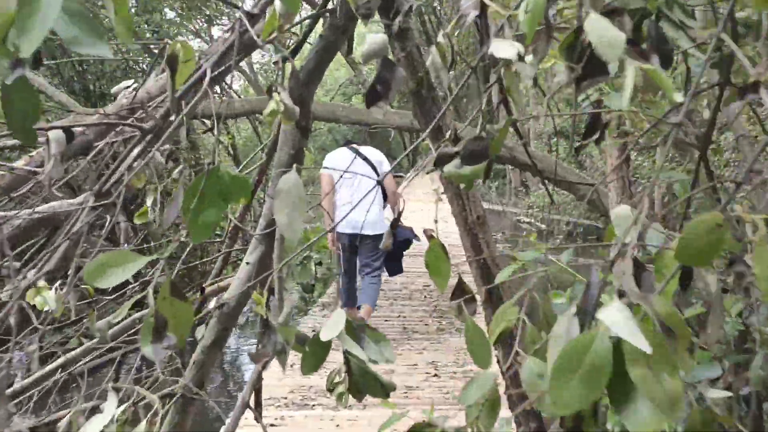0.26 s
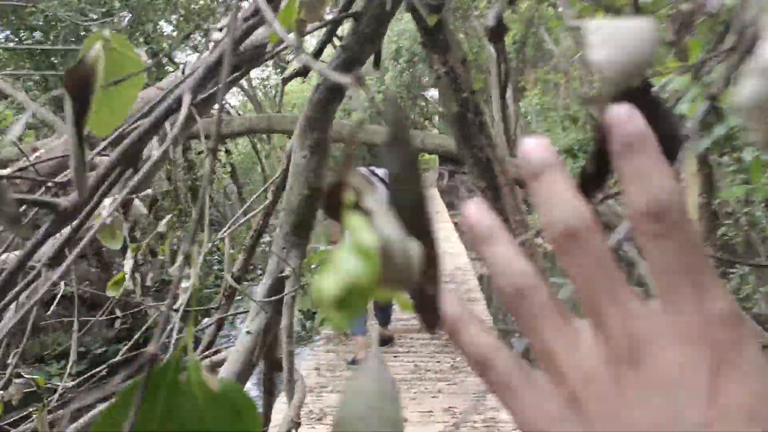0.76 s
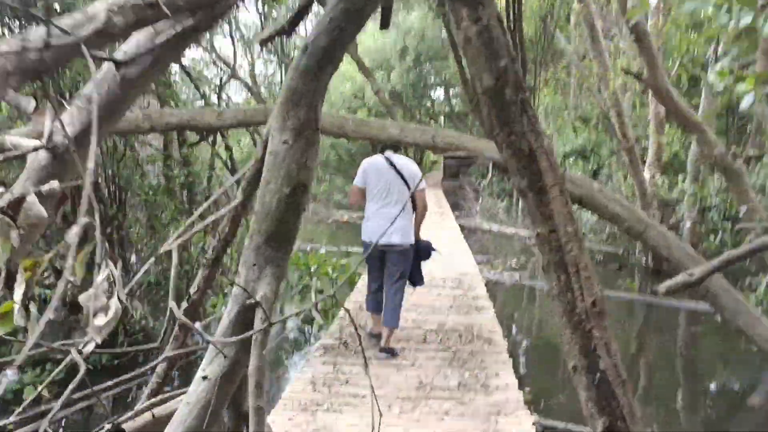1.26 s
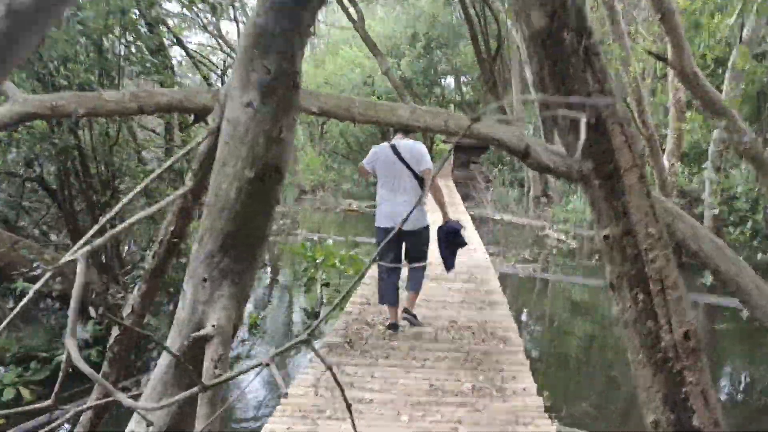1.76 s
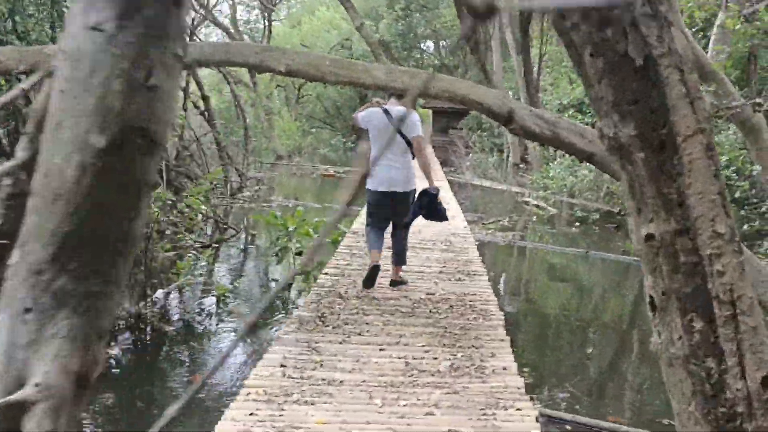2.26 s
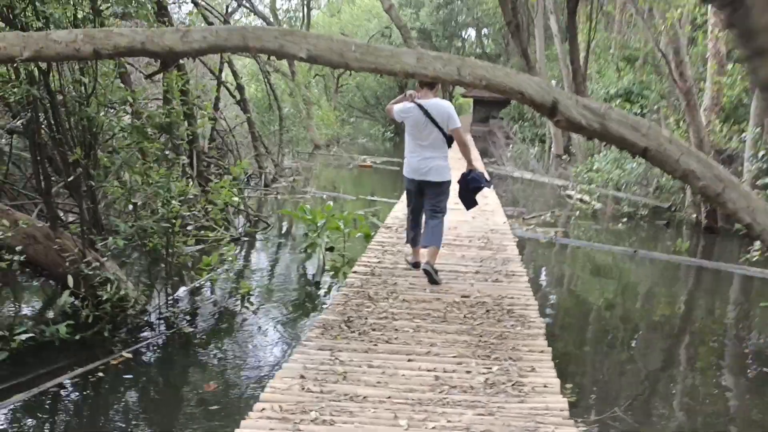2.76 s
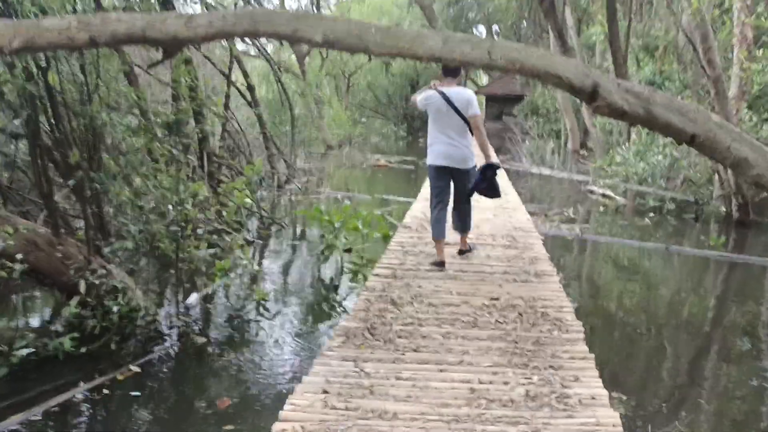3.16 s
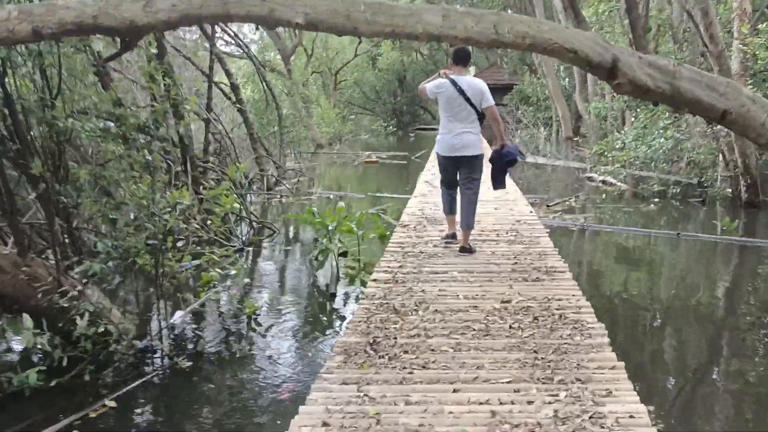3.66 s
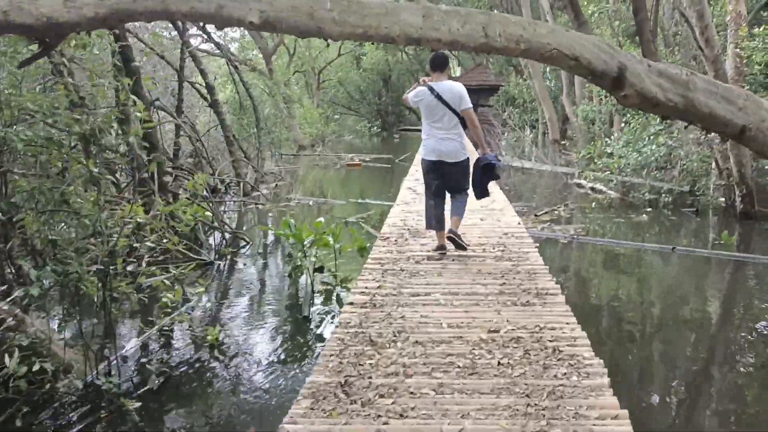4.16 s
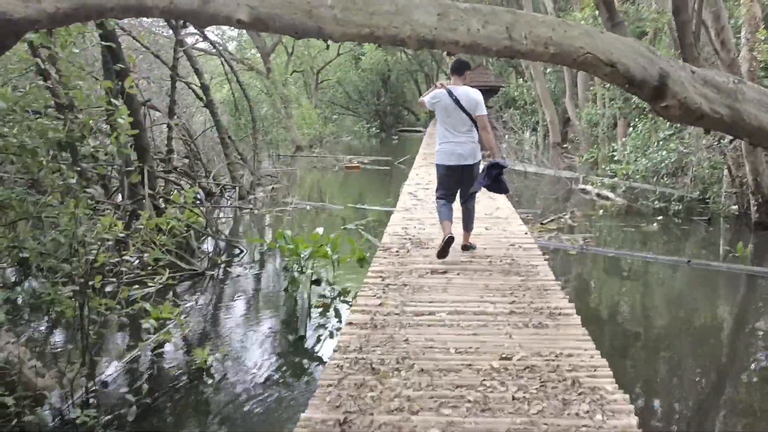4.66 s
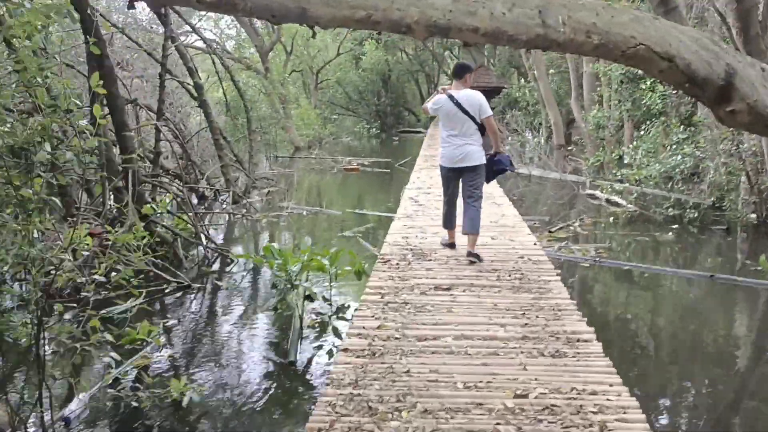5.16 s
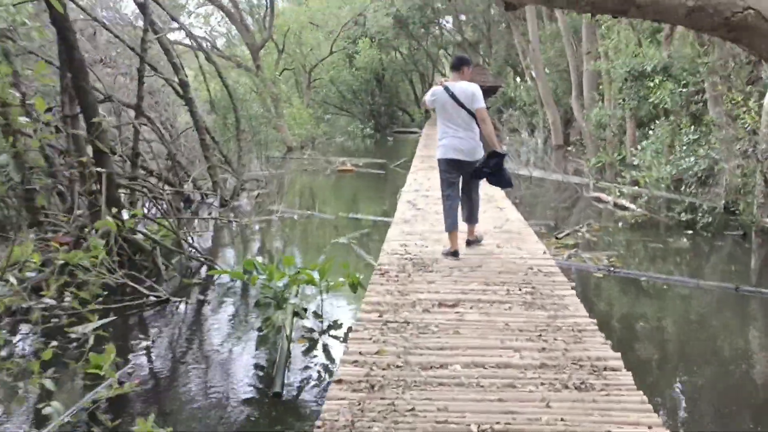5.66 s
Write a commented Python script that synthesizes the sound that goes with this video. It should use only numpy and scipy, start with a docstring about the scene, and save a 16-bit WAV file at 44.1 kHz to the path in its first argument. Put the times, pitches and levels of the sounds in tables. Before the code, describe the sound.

A walker carries two microphones along a bamboo boardwalk through a mangrove forest. From the start to about 2.6 s, branches drag past very close: coarse rubbing, crisp leaf crinkle and short stem scrapes come in overlapping strokes. A stem cracks sharply near 0.8 s; twigs flick and knock, densest from 1.8 to 2.6 s, with the hardest snap just before 2.0 s, leaning left. A lower rasp drags underneath from 1.6 to 2.4 s. Then it quiets abruptly. Soft leaf swells brush the left between 2.9 and 3.8 s, and a few return after 5.3 s. Light steps clack at about 2.2, 3.1, 3.7, 4.5 and 5.6 s, some faintly hollow. Low puffs of air bump the microphones between 2.7 and 4.3 s. Faint high bird whistles run throughout, with falling phrases at 3.3 and 4.8 s, lingering in the trees over low forest noise and a barely audible shimmer.

```python
"""A bamboo boardwalk through a mangrove forest, heard by a walker carrying two microphones.
In the first seconds low branches drag past close by: random slips are coloured as rub, crinkle and rasp, and
twigs, snaps and cracks are struck resonances and pulses. Slats clack underfoot over a hollow pole, soft swells
of rub and crinkle come and go, and puffs of air are low noise. Small birds whistle arched and falling gliding
tones that linger in a diffuse tail among the trees, over a low forest noise and a faint high shimmer."""
import sys
import numpy as np
from scipy import signal
from scipy.fft import rfft, irfft, next_fast_len
from scipy.io import wavfile

SR = 44100
rng = np.random.default_rng(int(sys.argv[2]) if len(sys.argv) > 2 else 0)


def unload_wav(signal):
    """Save mono or channel-first audio to the path in sys.argv[1] as 16-bit WAV at rate SR, clipped to [-1, 1]."""
    wavfile.write(
        sys.argv[1],
        SR,
        np.round(np.clip(np.atleast_2d(signal).T, -1, 1) * 32767).astype(np.int16),
    )


N = 260101
TIME = np.arange(N) / SR


def from_db(db):
    """Decibels to gain."""
    return 10 ** (np.asarray(db) / 20)


def rms_one(x):
    """Scale to rms 1."""
    return x / np.sqrt(np.mean(x ** 2) + 1e-20)


def peak_one(x):
    """Scale to peak 1."""
    return x / (np.abs(x).max() + 1e-20)


def butter(order, hz, kind="low"):
    """Sections of a smooth filter that passes the low, high or band range."""
    return signal.butter(order, hz, kind, fs=SR, output="sos")


def panned(x, pan_db):
    """Share a level difference, left minus right, between the two sides."""
    return x * from_db(np.array([[.5], [-.5]]) * pan_db)


def add(out, s, sound):
    """Mix a short stereo sound in at time s."""
    at = int(round(s * SR))
    first, last = max(at, 0), min(at + sound.shape[-1], N)
    out[:, first:last] += sound[:, first - at:last - at]


def drift(rate, size=N):
    """Smooth random wander of spread 1, with rate turning points per second at most."""
    knots = rng.standard_normal(size // 8 + 4)
    wander = np.interp(np.arange(size) * rate / SR, np.arange(len(knots)), knots)
    return wander * np.sqrt(3 / 2)   # interpolation had narrowed the spread


def coloured(x, spectrum):
    """Filter a signal by a curve of gain over frequency, steep beyond its ends; rms 1."""
    hz, db = np.transpose(spectrum)
    size = next_fast_len(N)
    log_hz = np.log(np.maximum(np.fft.rfftfreq(size, 1 / SR), 1))
    outside = np.maximum(np.log(hz[0]) - log_hz, 0) + np.maximum(log_hz - np.log(hz[-1]), 0)
    gain = from_db(np.interp(log_hz, np.log(hz), db) - 30 * outside)
    return rms_one(irfft(rfft(x, size) * gain, size)[..., :N])


def resonance(x, hz, t60):
    """A damped mode with gain 1 at its top, falling 60 dB in t60 seconds."""
    r = from_db(-60 / (max(t60, .001) * SR))
    top = np.array([1, 0, -1]) * (1 - r * r) / 2
    return signal.lfilter(top, [1, -2 * r * np.cos(2 * np.pi * hz / SR), r * r], x)


def pair(three, alike):
    """One shared and two separate signals make a stereo pair."""
    alike = np.clip(alike, 0, 1)
    return np.sqrt(alike) * three[0] + np.sqrt(1 - alike) * three[1:]


def slips(per_s, spread_db, smooth):
    """Friction: tiny slips of uneven size on a bed of smooth hiss, three unrelated rows."""
    sizes = from_db(spread_db * np.minimum(rng.exponential(1, (3, N)), 4))
    clicks = sizes * rng.choice([-1, 1], (3, N)) * (rng.random((3, N)) < per_s / SR)
    return rms_one(clicks) + smooth * rng.standard_normal((3, N))


def contact(rattle, rattle_s, size=8192):
    """A stereo click followed by a dying rattle."""
    force = rattle * rng.standard_normal((3, size)) * np.exp(-np.arange(size) / SR / rattle_s)
    force = pair(force, alike=0.15)
    force[:, 0] += 1
    return force


def stroke(s, hold_s, rise_s, fall_s):
    """Gain of a contact: rise, hold, fall; rise and fall times span 20 dB."""
    before_s, after_s = np.maximum(s - TIME, 0), np.maximum(TIME - s - hold_s, 0)
    return from_db(-20 * (before_s / rise_s + after_s / fall_s))


def bump(s, length):
    """A smooth swell of height 1 at time s, some 17 dB down one length to either side."""
    return np.exp(-2 * np.minimum(((TIME - s) / length) ** 2, 20))


# Side on which the branches pass, first right, then left.
# Each row: time in seconds, delay at the right microphone in seconds.
PASSING_SIDE = [(1.2, -.00014), (1.55, .0002)]


def far_side(x):
    """The microphone facing away from a near sound hears it a little later."""
    lag_s = np.interp(TIME, *np.transpose(PASSING_SIDE))
    return np.array([x[0], np.interp(TIME - lag_s, TIME, x[1])])


def thin_hiss(hz):
    """A narrow band of stereo hiss around one pitch; rms 1."""
    band = butter(2, [hz / 1.07, hz * 1.07], "band")
    return rms_one(signal.sosfilt(band, rng.standard_normal((2, N))))


# A faint shimmer high over the forest, as of far insects.
# Each row: frequency in Hz, level in dB.
SHIMMER = [(8050, -79), (10300, -84)]
SHIMMER_FLICKER_DB, SHIMMER_FLICKERS_PER_S = 1, 9.8


def shimmer():
    """Each high band of hiss flickers on its own."""
    out = np.zeros((2, N))
    for hz, db in SHIMMER:
        out += thin_hiss(hz) * from_db(db + SHIMMER_FLICKER_DB * drift(SHIMMER_FLICKERS_PER_S))
    return out


# Colour of the forest all around. Each row: frequency in Hz, relative level in dB per Hz.
FOREST_COLOUR = [(25, -5.5), (40, -10.5), (60, 6.5), (110, 7), (170, 1), (260, -2.5), (400, -12),
                 (750, -14.5), (1100, -17.5), (1600, -23), (2300, -30), (3200, -38.5)]
FOREST_DB = -62


def forest():
    """Low noise, mostly alike at both microphones, wavers slightly together with the shimmer."""
    noise = coloured(pair(rng.standard_normal((3, N)), alike=0.77), FOREST_COLOUR)
    return (from_db(FOREST_DB) * noise + shimmer()) * from_db(0.67 * drift(20))


# One falling phrase, sung twice. Each row: start in seconds, level in dB before the mix.
SONGS = [(3.312, -51), (4.835, -52.5)]
# Its syllables. Each row: start within the phrase in seconds, length in seconds, start pitch in Hz,
# end pitch in Hz, arch in Hz, level in dB against the song, rasp from 0 to 1, left minus right in dB,
# undertone in dB against the whistle.
PHRASE = [(0, .125, 3820, 3900, 300, -2.5, .1, 9, 0), (.04, .14, 4065, 3900, 40, 3.5, .65, 2.5, -22),
          (.39, .13, 3860, 3700, 0, -1, .06, 12, -9), (.49, .1, 3620, 3570, 0, -.5, .4, -6, -28),
          (.77, .165, 3660, 3540, 0, -1.5, .1, -2, -18.5)]
# Single whistles among the trees. Each row: start in seconds, length in seconds, start pitch in Hz,
# level in dB before the mix, left minus right in dB.
WHISTLES = [(-.08, 0.25, 3893, -50.5, 4.5), (0.28, 0.27, 3948, -52, 0.5), (0.859, 0.066, 3810, -55, 4),
            (1.029, 0.14, 3823, -49.5, 7), (1.219, 0.11, 3780, -59, 0), (1.456, 0.079, 3797, -47.5, 4.5),
            (2.194, 0.13, 3767, -52.5, 5), (2.556, 0.22, 3710, -55, 6.5), (2.867, 0.38, 5024, -65.5, 13.5),
            (3.459, 0.39, 4990, -70.5, 6.5), (4.015, 0.22, 4305, -69, 5), (4.424, 0.18, 4570, -70.5, 7.5),
            (5.283, 0.12, 3798, -49, 2.5), (5.32, 0.59, 4684, -66.5, 5.5),
            (5.429, 0.038, 2393, -63.5, 19.5)]
SAG_HZ_PER_S, WHISTLE_RASP = 280, 0.086   # every single whistle sinks at the same rate
WHISTLE_UNDERTONE_DB = -3.5


def notes():
    """Lay out every note of both songs and the single whistles, in the order that birds() unpacks."""
    out = []
    for song_s, song_db in SONGS:
        for s, length, start_hz, end_hz, arch_hz, db, *rest in PHRASE:
            out.append((song_s + s, length, start_hz, end_hz, arch_hz, song_db + db, *rest))
    for s, length, hz, db, pan_db in WHISTLES:
        end_hz = hz - SAG_HZ_PER_S * length
        out.append((s, length, hz, end_hz, 0, db, WHISTLE_RASP, pan_db, WHISTLE_UNDERTONE_DB))
    return out


# Weaker partials of the lower voices, whose whistle is the second partial.
# Each row: multiple of the fundamental, level in dB against the note's undertone setting.
VOICE = [(1, -4), (3, -26.5)]
OCTAVE_DB, PARTIAL_PAN_DB = -24.5, 3   # octave over the whistle; all added partials lie further left
PARTIAL_BREAK_DB = 3.5   # the weaker partials come and go within a note


def birds():
    """Thin whistles that arch or fall; a fast flutter of pitch makes some notes rasp."""
    out = np.zeros((2, N))
    for s, length, start_hz, end_hz, arch_hz, db, rasp, pan_db, undertone_db in notes():
        size = int(length * SR)
        along = np.clip(np.arange(size) / SR / length, 0, 1)
        hz = start_hz + (end_hz - start_hz) * along + arch_hz * np.sin(np.pi * along)
        hz = hz + 26 * drift(70, size) + 260 * rasp * drift(700, size)
        phase = 2 * np.pi * np.cumsum(hz) / SR
        swell = np.sqrt(2 * np.abs(np.sin(np.pi * along))) * from_db(db + 3.03 * drift(48, size))
        note = panned(np.sin(phase), pan_db)
        if 3000 < start_hz < 4200:   # the lower voices
            partials = from_db(OCTAVE_DB) * np.sin(2 * phase)
            for multiple, partial_db in VOICE:
                level_db = undertone_db + partial_db + PARTIAL_BREAK_DB * drift(72.8, size)
                partials = partials + from_db(level_db) * np.sin(phase * multiple / 2)
            note = note + panned(partials, pan_db + PARTIAL_PAN_DB)
        add(out, s, swell * note)
    return out


FOREST_T60_S = 0.6


def among_trees(x):
    """Trunks scatter a sound into a diffuse tail, different on each side."""
    age = np.arange(SR) / SR
    fade = from_db(-60 * age / FOREST_T60_S) * (1 - np.exp(-age / 0.017))
    tail = rng.standard_normal((2, SR)) * fade
    tail /= np.sqrt(np.sum(tail ** 2, axis=1, keepdims=True))
    return signal.fftconvolve(x, tail, axes=1)[:, :N]


# Branches sliding past close by. Each row: time of full contact in seconds, hold in seconds, rise in seconds,
# trail in seconds, rub at the left in dB, edge against the rub in dB, crinkle in dB,
# low rasp in dB before a 2 dB lift, left minus right in dB.
BRANCHES = [(0.33, 0.2, 0.21, 0.3, -41, -1, -55, -73.5, 6),
            (0.622, 0.18, 0.15, 0.53, -42.5, 1.5, -53, -71, 3),
            (1.074, 0.12, 0.052, 0.34, -49, 2, -63.5, -74.5, 3.5),
            (1.195, 0.33, .1, 0.16, -52.5, 1, -63.5, -87.5, 21),
            (1.576, 0.43, 0.03, 1, -44.5, 0.5, -60, -60, 9.5),
            (1.869, 0.085, 0.059, 1, -44, 4.5, -59.5, -56.5, 4.5),
            (2.081, 0.0054, 0.029, 0.054, -40, -5, -54.5, -74, 3),
            (2.193, 0.07, 0.034, 0.65, -45, 4.5, -56.5, -52.5, 3.5),
            (2.348, 0.22, 0.26, 0.35, -41.5, 2.5, -57.5, -65.5, 4.5)]
# Soft broadband swells of rub and crinkle, some coinciding with the bird calls.
# Each row: time of peak in seconds, half-width in seconds, rub at the left in dB, crinkle in dB,
# left minus right in dB.
SOFT_SWELLS = [(2.888, 0.078, -49.5, -66.5, 19), (3.019, 0.066, -50, -63.5, 22),
               (3.114, 0.05, -49, -58.5, 19), (3.214, 0.069, -70, -63.5, 28),
               (3.432, 0.12, -54.5, -62.5, 23), (3.565, 0.028, -50.5, -61.5, 17),
               (3.735, 0.05, -52, -56.5, 21), (5.321, 0.064, -60, -62, 5.5), (5.812, 0.054, -66, -59.5, 5),
               (5.888, 0.067, -50.5, -61, 2.5)]
IDLE_RUB_DB, IDLE_CRINKLE_DB, IDLE_PAN_DB = -73, -82, 19   # a faint steady rub and crinkle underneath
SLIP_OFF_S = 0.064   # time to fall 20 dB when a branch lets go
TRAIL_DB, TRAIL_PAN_DB = -2.5, 13   # its last leaves trail on lightly, further left
FLUTTER_DB, FLUTTERS_PER_S = 1.4, 70
CRINKLE_PAN_SHARE = 0.22   # of a contact's level difference between the sides


def friction_levels():
    """Powers of all layers add up to stereo dB levels of rub body, rub edge, crinkle and low rasp."""
    # the soft swells and the trailing leaves flutter in level
    flutter = from_db(FLUTTER_DB * drift(FLUTTERS_PER_S))
    touches = [(np.ones(N), IDLE_RUB_DB, 0, IDLE_CRINKLE_DB, IDLE_PAN_DB)]
    for s, length, rub_db, crinkle_db, pan_db in SOFT_SWELLS:
        touches.append((bump(s, length) * flutter, rub_db, 0, crinkle_db, pan_db))
    body, edge, crinkle, rasp = np.full((4, 2, N), 1e-18)
    for s, hold_s, rise_s, trail_s, rub_db, edge_db, crinkle_db, rasp_db, pan_db in BRANCHES:
        grip = stroke(s, hold_s, rise_s, SLIP_OFF_S)
        trail = from_db(TRAIL_DB) * flutter * stroke(s, hold_s, rise_s, trail_s)
        touches.append((grip, rub_db, edge_db, crinkle_db, pan_db))
        touches.append((trail, rub_db, edge_db, crinkle_db, pan_db + TRAIL_PAN_DB))
        rasp += panned(from_db(rasp_db) * grip, pan_db) ** 2
    for gain, rub_db, edge_db, crinkle_db, pan_db in touches:
        rub = from_db([[rub_db], [rub_db - pan_db]]) * gain
        body += rub ** 2
        edge += (from_db(edge_db) * rub) ** 2
        crinkle += panned(from_db(crinkle_db) * gain, CRINKLE_PAN_SHARE * pan_db) ** 2
    return 10 * np.log10([body, edge, crinkle, rasp])


PATCHY_DB, PATCHES_PER_S = 2.5, 24   # the colour of the rub keeps shifting
RUB_PAN_DB_PER_OCTAVE = -4   # lower bands lie further left


def patchy(x, count=6):
    """Each part of the spectrum up to 4.5 kHz swells and fades on its own; rms 1."""
    out, rest = 0, x
    for hz in np.geomspace(1250, 4500, count):
        band = signal.sosfiltfilt(butter(4, hz), rest)
        rest = rest - band
        placed = panned(band, RUB_PAN_DB_PER_OCTAVE * np.log2(hz / 2000))
        out = out + placed * from_db(PATCHY_DB * drift(PATCHES_PER_S))
    return rms_one(out + rest)


# Colours of firm and of light rubbing. Each row: frequency in Hz, relative level in dB per Hz.
RUB_COLOUR = [(700, -29.5), (950, -15.5), (1100, -2.5), (1400, -1.5), (1780, 0.5), (2100, -5.5), (2600, -2),
              (3600, -7.5), (4600, -12.5), (6500, -21)]
LIGHT_RUB_COLOUR = [(800, -42.5), (1300, -6), (1800, 15), (2200, 3.5), (2700, 5.5), (3700, 7), (4600, -3),
                    (6500, -8)]
RUB_EDGE_HZ = 2300   # above this a rub has its edge, below it its body


def rubbing(body_db, edge_db):
    """Stick and slip close by: firm contact sounds fuller, light contact rings near one pitch."""
    fine = slips(per_s=900, spread_db=2.0, smooth=0.35)
    catches = slips(per_s=110, spread_db=2.0, smooth=0)
    pressure = from_db(2.0 * drift(170) + .8 * drift(30))
    friction = pair(fine + 0.46 * catches, alike=0.47) * pressure
    firm = np.clip((body_db[0] + 48.5) / 9, 0, 1)
    full = coloured(friction, RUB_COLOUR)
    light = coloured(friction[:, ::-1], LIGHT_RUB_COLOUR)   # reversed in time, so its slips differ
    sound = patchy(np.sqrt(firm) * full + np.sqrt(1 - firm) * light)
    body = signal.sosfiltfilt(butter(2, RUB_EDGE_HZ), sound)
    return far_side(body * from_db(body_db) + (sound - body) * from_db(edge_db))


SNAPS_PER_S, SNAP_DB, SNAP_CYCLES = 78, -13.5, 11   # rate, level against the rub, ring length
SNAP_LOW_HZ, SNAP_HIGH_HZ = 1180, 3860


def snaps(rub_db, count=8):
    """Small stems snap at random within the rub, each ringing a few cycles at one of several pitches."""
    out = np.zeros((2, N))
    for hz in np.geomspace(SNAP_LOW_HZ, SNAP_HIGH_HZ, count):
        sizes = from_db(3 * np.clip(rng.standard_normal((2, N)), -2, 2))
        clicks = sizes * (rng.random(N) < SNAPS_PER_S / count / SR) + 1e-18
        out += rms_one(resonance(clicks, hz, SNAP_CYCLES / hz))
    out = signal.sosfilt(butter(2, [900, 4500], "band"), out)
    return far_side(rms_one(out) * from_db(rub_db + SNAP_DB))


# Colours of crinkling leaves and of the low rasp. Each row: frequency in Hz, relative level in dB per Hz.
CRINKLE_COLOUR = [(2000, 2.5), (4000, 0), (6500, 2), (8000, 10.5), (9100, 4.5), (10300, 9.5), (11700, -1),
                  (14000, -1.5), (16000, -9.5)]
RASP_COLOUR = [(200, -28.5), (330, -1), (420, 4.5), (510, 10.5), (680, -8.5), (850, -0.5), (1200, 9),
               (2000, -35)]
SKIM_CRISPNESS = 0.59   # dB more at the very top per dB that the crinkle stands over the rub


def foliage(crinkle_db, rub_db, rasp_db):
    """Leaves crinkle in clumps; heavier branches drag with a low rasp."""
    grains = pair(slips(per_s=1500, spread_db=3.5, smooth=0.6), alike=0.016)
    grains = grains * from_db(1.32 * drift(120) + 0.5 * drift(30))
    crinkle = coloured(grains, CRINKLE_COLOUR)
    # hard contact and a mere skim are both crisper, and the very top comes and goes with the angle of the leaves
    top = signal.sosfiltfilt(butter(4, 11000, "high"), crinkle)
    crisp_db = np.clip(0.077 * (crinkle_db + 55.0), -8, 1) + 2.0 * drift(32)
    crisp_db = crisp_db + SKIM_CRISPNESS * np.maximum(crinkle_db[0] - rub_db[0], 0)
    crisp_top = panned(top * from_db(crisp_db), pan_db=15.0)
    crinkle = from_db(crinkle_db) * (crinkle - top + crisp_top)
    drag = pair(slips(per_s=500, spread_db=3.0, smooth=0.5), alike=0.67)
    drag = drag * from_db(2.2 * drift(60))
    return crinkle + from_db(rasp_db + 2) * coloured(drag, RASP_COLOUR)


# Stems scraping past close by. Each row: start in seconds, length in seconds, start pitch in Hz,
# end pitch in Hz, level in dB, left minus right in dB.
SCRAPES = [(0.204, 0.13, 1550, 1380, -53, 7), (0.312, 0.097, 1370, 1154, -51, 1),
           (0.598, 0.13, 1480, 1280, -48.5, 6), (0.635, 0.018, 1770, 1770, -38.5, 3.5),
           (0.719, 0.06, 3170, 3880, -46, 1), (1.102, 0.052, 2050, 890, -49, -3),
           (2.188, .075, 1830, 1400, -46.5, 4.5), (2.378, 0.084, 1060, 1260, -52.5, 13)]
SCRAPE_CYCLES, SCRAPE_SLIPS_PER_S = 43, 790   # ring length of a stem; rate of its slips


def scrapes():
    """Uneven slips pluck a stem whose pitch glides with the point of contact."""
    out = np.zeros((2, N))
    for s, length, start_hz, end_hz, db, pan_db in SCRAPES:
        size = int(length * SR)
        along = np.arange(size) / size
        hz = start_hz + (end_hz - start_hz) * along
        turn = np.exp(2j * np.pi * np.cumsum(hz) / SR)
        plucks = (rng.random((3, size)) < SCRAPE_SLIPS_PER_S / SR) + 0.047
        force = pair(plucks * rng.standard_normal((3, size)), alike=0.27)
        r = from_db(-60 * start_hz / (SCRAPE_CYCLES * SR))
        # a decay in the turning frame is a ring that follows the glide
        stem = (turn * signal.lfilter([1], [1, -r], force / turn)).imag
        stem = signal.sosfilt(butter(2, min(start_hz, end_hz), "high"), stem)
        swell = np.sqrt(np.sin(np.pi * along))
        add(out, s, panned(from_db(db) * rms_one(stem * swell), pan_db))
    return far_side(out)


# Twigs flicking close by. Each row: time in seconds, knock peak in dB before panning, pitch in Hz,
# scrape decay in seconds, left minus right in dB.
TWIGS = [(0.399, -35, 1180, 0.0051, -5), (0.7, -32, 1580, .002, 1), (.717, -20.5, 1520, 0.005, 3),
         (0.7872, -30, 2100, 0.004, 9), (0.915, -40, 900, 0.022, 3), (1.068, -36, 2020, 0.0077, 12),
         (1.11, -32, 2190, 0.0042, 1), (1.129, -29, 1680, 0.0064, 11), (1.353, -36, 3520, 0.021, 2),
         (1.574, -36.5, 1150, 0.016, 18), (1.779, -31.5, 1470, 0.0096, 12), (1.874, -21, 1550, 0.0092, 9),
         (1.895, -28, 1500, 0.0034, 11), (1.947, -25, 1320, 0.0026, 8), (1.9847, -9.5, 1680, 0.0051, 8.5),
         (2.09, -33, 1330, 0.0032, 9.5), (2.186, -26.5, 1740, 0.017, 8.5),
         (2.303, -30.5, 1100, 0.0098, 7.5), (2.4604, -35, 1200, 0.0038, 3),
         (2.5, -23.5, 1730, 0.0074, 16.5), (2.559, -24, 1490, 0.0089, 16.5),
         (2.918, -40, 2000, 0.0055, 14.5), (2.954, -46, 1480, 0.0087, 11), (3.194, -47, 3300, 0.017, 19),
         (3.219, -46, 3200, 0.025, 23), (3.888, -49.5, 2822, 0.018, 20), (4.931, -45.5, 2600, 0.0079, 15)]
BRIGHT = butter(2, 4500, "high")


def twigs():
    """A twig rings for a few cycles under a thin crack and may scrape on."""
    out = np.zeros((2, N))
    dull = np.vstack([butter(2, [600, 4200], "band"), butter(4, 4600)])
    for s, peak_db, hz, scrape_s, pan_db in TWIGS:
        force = contact(rattle=8.8 * scrape_s, rattle_s=scrape_s)
        knock = peak_one(signal.sosfilt(dull, resonance(force, hz, t60=9 / hz)))
        crack = from_db(-22) * signal.sosfilt(BRIGHT, force)
        add(out, s, panned(from_db(peak_db) * (knock + crack), pan_db))
    return far_side(out)


# Feet on the slats below. Each row: time in seconds, clack peak in dB before panning, clack pitch in Hz,
# hollow level in dB, hollow pitch in Hz, left minus right of the clack in dB.
STEPS = [(0.517, -53, 1500, -45.5, 520, -5), (.787, -38, 915, -48.5, 585, -16),
         (2.221, -32, 1580, -63, 471, -2), (3.104, -35.5, 1350, -73, 400, 4.5),
         (3.144, -34, 1740, -57, 293.5, 7.5), (3.73, -38.5, 1980, -75, 476, 4.5),
         (4.531, -33, 1570, -49, 406, 5), (5.051, -49.5, 1650, -81, 390, -3),
         (5.629, -44.5, 1860, -59.5, 307, 5), (5.644, -42.5, 1810, -72, 464, 3),
         (5.734, -41, 1860, -79, 396, 7)]
SLAT_LOW_MODE, SLAT_LOW_LEVEL = 0.78, 0.23   # lower mode of a slat: times the clack pitch, weight
POLE_OVERTONE, POLE_OVERTONE_LEVEL = 1.75, 0.05   # second mode of a pole: times the hollow pitch, weight


def steps():
    """A slat clacks on its neighbours; as the weight comes down the hollow pole answers."""
    out = np.zeros((2, N))
    sole = np.vstack([butter(2, [850, 2700], "band"), butter(2, 3400)])
    for s, clack_db, clack_hz, hollow_db, hollow_hz, pan_db in STEPS:
        force = contact(rattle=0.63, rattle_s=0.0069) + contact(rattle=0.21, rattle_s=0.021)
        age = np.arange(force.shape[1]) / SR
        # a soft sole takes a moment to press down
        force = force * (1 - 0.22 * np.exp(-age / 0.0021))
        slat = resonance(force, clack_hz, t60=0.0076)
        slat = slat + SLAT_LOW_LEVEL * resonance(force, SLAT_LOW_MODE * clack_hz, t60=0.043)
        clack = peak_one(signal.sosfilt(sole, slat))
        noise, overtone_noise = rng.standard_normal((2, len(age)))
        pole = np.sin(2 * np.pi * hollow_hz * age)
        pole = pole + 0.54 * rms_one(resonance(noise, 0.98 * hollow_hz, t60=0.082))
        overtone = rms_one(resonance(overtone_noise, POLE_OVERTONE * hollow_hz, t60=0.0039))
        pole = pole + POLE_OVERTONE_LEVEL * overtone
        hollow = peak_one(age ** 2 * np.exp(-age / 0.0072)) * pole
        add(out, s, panned(from_db(clack_db) * clack, pan_db) + from_db(hollow_db) * hollow)
    return out


# Single leaves snapping back. Each row: time in seconds, peak in dB before a 6.5 dB lift and panning.
LEAF_TICKS = [(0.523, -35.5), (1.063, -37.5), (1.1326, -39.5), (1.44, -38), (1.884, -31.5), (1.946, -38.5),
              (2.8994, -43), (3.2221, -41.5)]


def leaf_ticks():
    """A leaf gives only a bright tick without a ring."""
    out = np.zeros((2, N))
    for s, peak_db in LEAF_TICKS:
        tick = peak_one(signal.sosfilt(BRIGHT, contact(rattle=0.58, rattle_s=0.004)))
        add(out, s, panned(from_db(peak_db + 6.5) * tick, pan_db=4.0))
    return far_side(out)


# Dry stems breaking. Each row: time in seconds, peak in dB before panning, left minus right in dB.
CRACKS = [(0.785, -15.5, -6.5), (2.5589, -36, 2)]


def cracks():
    """A breaking stem gives one wide pulse with hardly any ring."""
    out = np.zeros((2, N))
    wood = butter(2, [600, 3200], "band")
    for s, peak_db, pan_db in CRACKS:
        pulse = peak_one(signal.sosfilt(wood, contact(rattle=0.013, rattle_s=0.0048)))
        add(out, s, panned(from_db(peak_db) * pulse, pan_db))
    return far_side(out)


# Puffs of air on the microphones. Each row: time of peak in seconds, half-width in seconds, level in dB,
# left minus right in dB.
PUFFS = [(2.758, 0.078, -51.5, -20), (3.112, 0.059, -51, -24.5), (3.285, 0.082, -57.5, -28),
         (3.618, 0.071, -43.5, -14.5), (3.912, 0.19, -54.5, 19), (4.095, 0.064, -44.5, -1.5),
         (4.252, 0.18, -54, -11), (5.42, 0.2, -59.5, -18.5)]
# Their colour. Each row: frequency in Hz, relative level in dB per Hz.
PUFF_COLOUR = [(25, -32), (42, -12), (58, -3.5), (85, 2.5), (120, -4.5), (170, -17.5), (260, -32.5),
               (500, -68)]


def puffs():
    """Eddies rumble on each microphone separately."""
    power = np.zeros((2, N))
    for s, length, db, pan_db in PUFFS:
        power += panned(from_db(db) * bump(s, length), pan_db) ** 2
    return np.sqrt(power) * coloured(rng.standard_normal((2, N)), PUFF_COLOUR)


# Very thin skims of hiss, as of leaf tips. Each row: time of peak in seconds, half-width in seconds,
# level in dB before panning.
SKIMS = [(4.445, 0.013, -71), (5.128, 0.045, -64), (5.238, 0.025, -61)]
SKIM_HZ = 9400   # their hiss starts here


def skims():
    """Brief swells of hiss at the very top, mostly on the left."""
    hiss = rms_one(signal.sosfilt(butter(3, SKIM_HZ, "high"), rng.standard_normal((2, N))))
    swells = sum(from_db(db) * bump(s, length) for s, length, db in SKIMS)
    return panned(hiss * swells, TRAIL_PAN_DB)


ECHO_LOW_HZ = 2790   # the whistles linger among the trees more than their undertones


def scene():
    """Near sounds are almost dry, the birds are deep in the trees."""
    song = birds()
    knocks = twigs() + steps() + leaf_ticks() + cracks()
    carried = signal.sosfilt(butter(2, ECHO_LOW_HZ, "high"), song)
    echoes = among_trees(from_db(-1.0) * carried + from_db(-18.0) * knocks)
    rub_db, edge_db, crinkle_db, rasp_db = friction_levels()
    brushing = rubbing(rub_db, edge_db) + snaps(rub_db) + scrapes()
    brushing = brushing + foliage(crinkle_db, rub_db, rasp_db) + skims()
    return forest() + brushing + knocks + puffs() + from_db(-5.5) * song + echoes


CUTOFF_HZ = 16000


def record(dry):
    """The top is cut steeply."""
    return signal.sosfilt(signal.ellip(10, .3, 70, CUTOFF_HZ, fs=SR, output="sos"), dry)


dry = scene()
out = record(dry)
unload_wav(out)
```